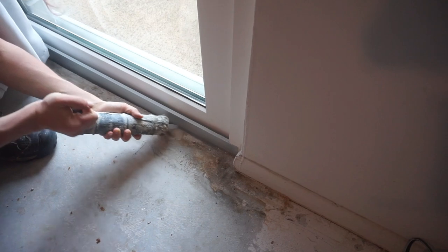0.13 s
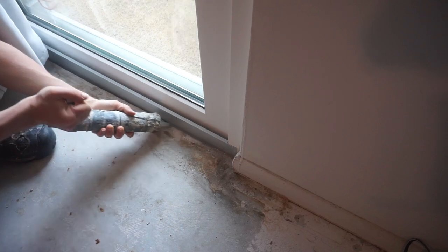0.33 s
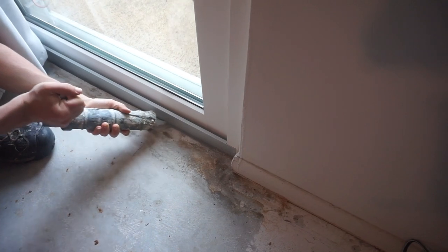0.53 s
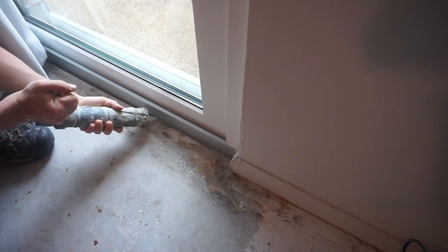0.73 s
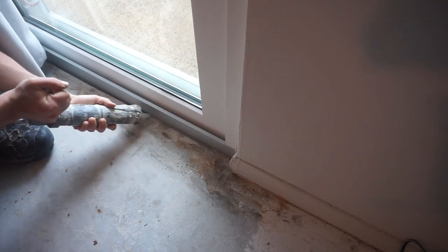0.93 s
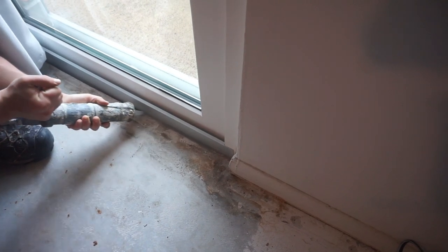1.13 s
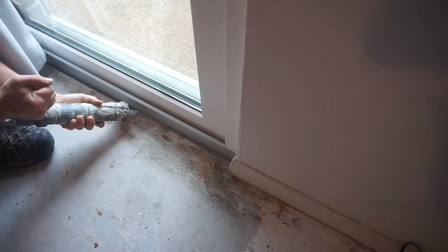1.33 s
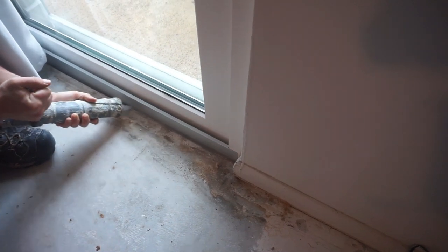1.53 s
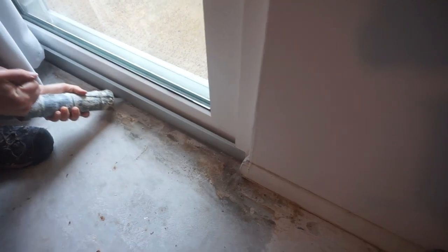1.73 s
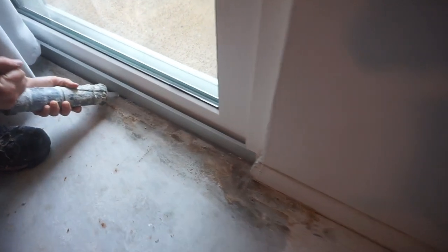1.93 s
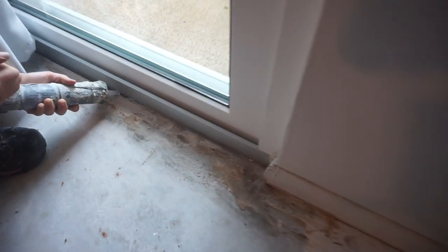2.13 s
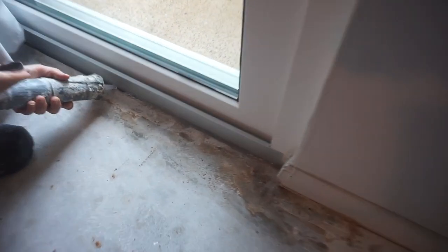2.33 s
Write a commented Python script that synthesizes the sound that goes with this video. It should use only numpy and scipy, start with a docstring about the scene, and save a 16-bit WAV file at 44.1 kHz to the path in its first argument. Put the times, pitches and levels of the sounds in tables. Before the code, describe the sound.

A hand caulking gun is worked close to the microphone in a bare, lightly reverberant room. Dry trigger ticks and low grip tocks start at once; the steel rod pings and squeaks briefly around 0.27-0.55 s. Sparse clicks and hollow cartridge knocks follow, firmer near 1.45 and 1.75-1.9 s, with cloth rustle and a shoe shift. At 2.2 s a loud, rapid steel clatter leaves a spring ringing. Faint air and hum underneath.

```python
"""A bare room, where a hand caulking gun is worked along a concrete edge. Over faint air and hum, noise bands
rustle as hands and clothes, and a shoe shifts once. Noise bursts and decaying modes make the trigger's ticks,
the grip's tocks and the cartridge's knocks. The steel rod pings in decaying modes and squeaks in gliding,
stuttering tones. At the end the mechanism springs back: a loud, short steel clatter of close blows, and tones
that ring on as the room answers."""
import sys
import numpy as np
from scipy import signal
from scipy.fft import rfft, irfft, next_fast_len
from scipy.io import wavfile
from scipy.ndimage import map_coordinates

SR = 44100
rng = np.random.default_rng(int(sys.argv[2]) if len(sys.argv) > 2 else 0)


def int16_out(signal):
    """Quantize to a 16-bit WAV file."""
    q = np.round(np.clip(np.atleast_2d(signal).T, -1, 1) * 32767)
    wavfile.write(sys.argv[1], SR, q.astype(np.int16))


N = 104869  # length in samples
CLOCK = np.arange(N) / SR  # s, the whole scene
T = np.arange(SR // 2) / SR  # s, time since a contact
HEAD = SR // 200  # samples: the first 5 ms, which set a contact's level


def amp(db):
    """Decibels to a linear gain."""
    return 10 ** (np.asarray(db) / 20)


def rms(x):
    """Root mean square level, never quite zero."""
    return np.sqrt(np.mean(x ** 2) + 1e-20)


def along(points, hz):
    """Read a curve of (f/Hz, value) points on a log frequency axis."""
    f, value = np.transpose(points)
    return np.interp(np.log(hz + 1), np.log(f + 1), value)


def filtered(x, response):
    """Shape the spectrum of x by a gain that depends on frequency."""
    n = x.shape[-1]
    padded = next_fast_len(n + 8192)
    spectrum = rfft(x, padded) * response(np.fft.rfftfreq(padded, 1 / SR))
    return irfft(spectrum, padded)[..., :n]


def noise(colour, width, size):
    """Coloured stereo noise, its mid at rms 1; width is side over mid."""
    white = rng.standard_normal((2, size))
    mid, side = filtered(white, lambda hz: amp(along(colour, hz)))
    return np.array([mid + width * side, mid - width * side]) / rms(mid)


def wobble(rate):
    """A smooth random curve with rate knots a second."""
    knots = rng.standard_normal(4096)
    return map_coordinates(knots, [CLOCK * rate], mode="wrap")


def pan(db):
    """Gains that set left over right by db, half on each side."""
    return amp([[db / 2], [-db / 2]])


def add(track, s, sound):
    """Mix a sound into the track at s seconds."""
    part = track[:, max(0, round(s * SR)):][:, :sound.shape[-1]]
    part += sound[:, :part.shape[1]]


def soft_start(attack):
    """Exponential rise of a contact, attack in s."""
    return 1 - np.exp(-T / attack)


def burst(colour, t60, attack, width):
    """Decaying coloured noise, like the densely packed, heavily damped modes of a dull contact."""
    x = noise(colour, width, size=len(T)) * amp(-60 * T / t60) * soft_start(attack)
    return x / rms(x[:, :2 * HEAD]) / np.sqrt(2)


def ring(modes, spread):
    """Sum of decaying sine modes, each reaching left and right in its own phase."""
    x = np.zeros((2, len(T)))
    for hz, db, t60 in modes:
        offset = spread * rng.normal() * np.array([[1], [-1]])
        phase = rng.uniform(0, 2 * np.pi) + offset
        x += amp(db - 60 * T / t60) * np.sin(2 * np.pi * hz * T + phase)
    return x * soft_start(0.0008)


DETUNE = 0.0077  # fraction: the changing grip shifts each mode a little from blow to blow


def struck(modes, spread):
    """A struck part: slightly detuned modes, at rms 1 over the first 5 ms."""
    detuned = [(hz * (1 + DETUNE * rng.normal()), db, t60) for hz, db, t60 in modes]
    x = ring(detuned, spread)
    return x / rms(x[:, :HEAD])


def tilted(modes, tilt_db):
    """The same modes, brighter or duller by dB per octave according to where the blow lands."""
    lowest_hz = modes[0][0]
    return [(hz, db + tilt_db * np.log2(hz / lowest_hz), t60) for hz, db, t60 in modes]


SNAP_T60, SNAP_DB = 0.004, -6  # s; dB relative to the crack's decay


def crack(colour, t60):
    """Steel meets steel: an instant snap over a short bright decay."""
    decay = burst(colour, t60, attack=0.00024, width=0.63)
    snap = burst(colour, SNAP_T60, attack=0.00016, width=0.59)
    return decay + amp(SNAP_DB) * snap


# how long the bare walls hold each frequency (f/Hz, t60/s)
ROOM_DECAY = [(150, 1), (600, 0.42), (2000, 0.55), (5000, 0.63), (11000, 0.39)]
# gain on the side of the reverb (f/Hz, side over mid as a ratio)
ROOM_SPREAD = [(150, 0.2), (500, 0.23), (1200, 0.88), (4000, 0.74)]


def in_room(x, wet_db):
    """Add the answer of bare walls: a noise tail in which each frequency dies at its own speed."""
    hz, t, z = signal.stft(rng.standard_normal((2, SR * 3 // 4)), SR, nperseg=256)
    decay = amp(-60 * t / along(ROOM_DECAY, hz)[:, None])
    mid, side = signal.istft(z * decay, SR, nperseg=256)[1]
    side = filtered(side, lambda f: along(ROOM_SPREAD, f))
    build_up = 1 - np.exp(-np.arange(len(mid)) / SR / 0.0033)
    tail = np.array([mid + side, mid - side]) * build_up
    mono = x.mean(0)[None]
    wet = signal.fftconvolve(mono, tail / np.linalg.norm(mid), axes=1)[:, :x.shape[1]]
    return x + amp(wet_db) * pan(0.31) * wet


# colour of the still air (f/Hz, relative level/dB)
AIR_COLOUR = [(20, -18), (45, -14), (100, 1.5), (300, 15), (800, 12.5), (2000, -14), (10000, -58)]
AIR_DB, HUM_HZ, HUM_DB = -60.5, 59, -82.5


def room_tone():
    """Faint still air as dark noise, with a trace of hum as one steady sine."""
    hum = amp(HUM_DB) * np.sqrt(2) * np.sin(2 * np.pi * HUM_HZ * CLOCK)
    return amp(AIR_DB) * noise(AIR_COLOUR, width=0.42, size=N) + hum


# rustle envelope of hands and clothes (t/s, level of the lows/dB, treble level before its trim/dB)
RUSTLE_MOVES = [(0, -44, -55), (.12, -56, -62.5), (.2, -44, -55.5), (.52, -48, -62), (0.679, -44.5, -58),
                (1.149, -46, -55.5), (1.311, -47.5, -60), (1.42, -64.5, -61), (1.53, -42.5, -48),
                (1.72, -45.5, -50.5), (1.84, -39, -42), (2.05, -47.5, -47.5), (2.19, -46.5, -41),
                (2.36, -72, -48)]
# colour of hands rubbing on the gun (f/Hz, relative level/dB)
RUB_COLOUR = [(60, -42), (150, -19.5), (280, -11), (420, 1), (620, 2.5), (900, 1), (1250, -0.5), (1700, -9),
              (3000, -14.5), (6000, -49)]
# colour of swishing clothes (f/Hz, relative level/dB)
SWISH_COLOUR = [(700, -17), (1600, 9), (2100, 4), (2500, 9), (3300, 3), (4200, 3), (6000, -2), (7600, -1.5),
                (9000, -4), (11000, -7.5)]
# colour of the shoe on the slab (f/Hz, relative level/dB)
SHOE_COLOUR = [(50, -26), (130, -12), (220, 8), (350, 12.5), (550, 3), (1000, -16), (2000, -40)]
SWISH_TRIM_DB = 4.0
SHOE_S, SHOE_DB = 1.908, -36.5


def handling():
    """Friction as noise in two bands: hands rub low, clothes swish high; a shoe shifts once."""
    s, *levels = np.transpose(RUSTLE_MOVES)
    low_db, treble_db = [np.interp(CLOCK, s, level) for level in levels]
    # a slow and a fast wobble, in dB, keep each band restless
    rub_db = low_db + 1.86 * wobble(25.13) + 1.8 * wobble(180)
    swish_db = treble_db + SWISH_TRIM_DB + 1.1 * wobble(20) + 1.36 * wobble(270)
    rub = amp(rub_db) * noise(RUB_COLOUR, width=0.52, size=N)
    swish = amp(swish_db) * noise(SWISH_COLOUR, width=0.73, size=N)
    out = pan(0.24) * (rub + swish)
    add(out, SHOE_S, amp(SHOE_DB) * burst(SHOE_COLOUR, t60=0.28, attack=0.0033, width=0.17))
    return out


# low tocks as the hand works the grip (t/s, level/dB)
GRIP_TOCKS = [(.036, -34.5), (0.155, -35), (0.323, -39.5), (0.367, -35), (0.414, -39), (.772, -39),
              (0.815, -40), (2.264, -41)]
# modes of the grip (f/Hz, relative level/dB, t60/s)
GRIP_MODES = [(397.3, -3.5, 0.07), (442.4, 1.5, 0.035), (538, -11, 0.071)]


def grip():
    """Low tocks of the handle: a few softly started modes."""
    out = np.zeros((2, N))
    for s, db in GRIP_TOCKS:
        add(out, s, amp(db) * struck(GRIP_MODES, spread=0.17) * soft_start(0.0021))
    return in_room(out, wet_db=-4.5)


# trigger ticks (t/s, level/dB, then body, ring and crack relative to it/dB, left over right/dB)
TRIGGER_TICKS = [(0.035, -29.5, -12.5, -11, -20, 5), (0.15, -21, -19.5, -7, -13, 5),
                 (0.231, -32.5, -10, -5, -7.5, 4.5), (0.645, -35, -9, -9, -9, 6.5),
                 (0.817, -22.5, -13.5, -13.5, -11.5, 5.5), (0.869, -19.5, -17.5, -12.5, -10.5, 7),
                 (1.096, -32, -9, -12.5, -13, 6), (1.314, -34.5, -14, -14.5, -14, 7),
                 (1.448, -26.5, -12.5, -9.5, -11.5, 9), (1.4558, -20, -11, -9.5, -16.5, 3),
                 (1.806, -22, -12, -16, -13, -3), (1.892, -23, -12, -18, -15, 4),
                 (2.111, -23.5, -12.5, -12, -25, 1)]
# colour of the tap in the handle (f/Hz, relative level/dB)
TICK_BODY_COLOUR = [(100, -41), (280, -24), (410, -1), (600, -2.5), (850, 2.5), (1080, -4), (1450, -5.5),
                    (2200, -45)]
# colour of the tick's brief ring (f/Hz, relative level/dB)
TICK_RING_COLOUR = [(1100, -29), (1700, -5), (2150, -12), (2420, 3.5), (2650, -0.5), (3000, 2), (3250, -8),
                    (4000, -49)]
# colour of small bright cracks, also in the knocks and pings (f/Hz, relative level/dB)
SMALL_CRACK_COLOUR = [(2400, -38), (3500, 6.5), (4400, 4.5), (5300, -1), (5900, 2.5), (7400, 2.5),
                      (9000, -6), (11000, -9.5)]


def trigger():
    """Small dry ticks, layered from damped noise: a tap in the handle, a brief ring and a crack."""
    out = np.zeros((2, N))
    for s, db, body_db, ring_db, crack_db, pan_db in TRIGGER_TICKS:
        tick = amp(body_db) * burst(TICK_BODY_COLOUR, t60=0.04, attack=0.00091, width=0.4)
        tick += amp(ring_db) * burst(TICK_RING_COLOUR, t60=0.049, attack=0.0011, width=0.59)
        tick += amp(crack_db) * crack(SMALL_CRACK_COLOUR, t60=0.032)
        add(out, s, in_room(amp(db) * pan(pan_db) * tick, wet_db=-7.0))
    return out


# cartridge knocks (t/s, level/dB, then body, ring and crack relative to it/dB, left over right/dB)
CARTRIDGE_KNOCKS = [(0.324, -27, -12.5, -13, -18, 1), (0.372, -20.5, -11, -13, -15, 3),
                    (0.575, -29.5, -6, -12.5, -22.5, 5.5), (0.856, -19.5, -15.5, -20, -19, 0),
                    (1.024, -28.5, -14, -13.5, -21, 6), (1.131, -29, -4, -16, -16, 1.5),
                    (1.245, -25.5, -4.5, -20.5, -26, 2), (1.295, -30.5, -5.5, -25, -27, 5),
                    (1.476, -19.5, -7.5, -14, -24, 3.5), (1.753, -14.5, -10.5, -14.5, -17, 2),
                    (1.791, -20, -8.5, -10, -20, 3), (1.874, -14.5, -8, -14, -24, 0.5),
                    (1.907, -20.5, -11, -12.5, -22, 3)]
# colour of the knock's body (f/Hz, relative level/dB)
KNOCK_BODY_COLOUR = [(100, -54), (300, -9), (560, -11.5), (800, 3.5), (950, 0.5), (1100, 1), (1300, -3.5),
                     (1600, -17), (2400, -55)]
# hollow modes of the cartridge (f/Hz, relative level/dB, t60/s)
TUBE_MODES = [(791, 0.5, 0.037), (995, 1, 0.024), (1115, -1, 0.037), (1280, -9, 0.034)]
# colour of the knock's ring, also of the scrape (f/Hz, relative level/dB)
KNOCK_RING_COLOUR = [(1200, -21), (1830, 2.5), (2100, -4), (2380, 4), (2800, -4), (3300, -2), (4500, -21)]
KNOCK_SOFTENING = 0.48  # dB less of the hollow modes per dB under the hardest knock


def cartridge():
    """Hollow knocks of the plastic cartridge in its cradle: tube modes inside damped noise."""
    out = np.zeros((2, N))
    hardest_db = max(row[1] for row in CARTRIDGE_KNOCKS)
    for s, db, body_db, ring_db, crack_db, pan_db in CARTRIDGE_KNOCKS:
        tube_db = body_db + KNOCK_SOFTENING * (db - hardest_db)
        knock = amp(body_db) * burst(KNOCK_BODY_COLOUR, t60=0.047, attack=0.0012, width=0.27)
        knock += amp(tube_db) * struck(TUBE_MODES, spread=0.64)
        knock += amp(ring_db) * burst(KNOCK_RING_COLOUR, t60=0.052, attack=0.00062, width=0.61)
        knock += amp(crack_db) * burst(SMALL_CRACK_COLOUR, t60=0.017, attack=0.00044, width=1.0)
        add(out, s, in_room(amp(db) * pan(pan_db) * knock, wet_db=-3.5))
    return out


# the rod slips in its catch (t/s, ring level/dB, crack level/dB, tilt/dB per octave, left over right/dB)
ROD_PINGS = [(0.2665, -19, -30.5, 0, 6), (0.4371, -23.5, -50, -10, 8)]
# modes of the steel rod (f/Hz, relative level/dB, t60/s)
ROD_MODES = [(1745, 2.5, 0.019), (1940, -3.5, 0.032), (2050, -11, 0.029), (2540, -1.5, 0.024),
             (3067, -7, 0.034), (4250, -8, 0.013), (5120, -8, 0.012)]
# squeaks (t/s, length/s, start f/Hz, end f/Hz, starting level/dB, upper partial/dB, roughness/dB)
ROD_SQUEAKS = [(.298, 0.024, 1852, 1805, -33.5, -12.5, 4.5), (.3705, 0.032, 1791, 1739, -27.5, -10, 1.4),
               (.402, 0.028, 1727, 1810, -40.5, -11, 3.5), (.404, 0.0263, 2386, 2060, -40, -30, 2.5),
               (0.443, 0.049, 1930, 1894, -41.5, -22, 4.5), (.53, 0.023, 1765, 1810, -46, -25, 0.5)]
SQUEAK_UPPER = 1.48  # frequency ratio of the upper partial
SQUEAK_THIRD_DB = -15  # third harmonic, relative to the upper partial
SQUEAK_JITTER = 17.7  # Hz of pitch jitter per dB of roughness
SQUEAK_EDGE_S, SQUEAK_SAG, SQUEAK_PAN_DB = 0.0046, 90, 12  # fade in s, sag in dB/s, left over right


def squeak(length, start_hz, end_hz, db, upper_db, rough_db):
    """Stick and slip in the catch: a gliding tone whose pitch and level stutter with roughness."""
    t = T[T < length]
    glide_hz = start_hz + (end_hz - start_hz) * t / length
    hz = glide_hz + SQUEAK_JITTER * rough_db * wobble(372)[:len(t)]
    phase = 2 * np.pi * np.cumsum(hz) / SR
    upper = np.sin(SQUEAK_UPPER * phase) + amp(SQUEAK_THIRD_DB) * np.sin(3 * phase)
    tone = np.sqrt(2) * (np.sin(phase) + amp(upper_db) * upper)
    stutter = amp(rough_db * wobble(413)[:len(t)])
    edges = np.clip(np.minimum(t, length - t) / SQUEAK_EDGE_S, 0, 1)
    level = amp(db - SQUEAK_SAG * t) * stutter / rms(stutter) * edges
    return pan(SQUEAK_PAN_DB) * level * tone


def rod():
    """The rod pings in steel modes as it slips, and squeaks as it slides through the catch."""
    out = np.zeros((2, N))
    for s, ring_db, crack_db, tilt_db, pan_db in ROD_PINGS:
        ping = amp(ring_db) * struck(tilted(ROD_MODES, tilt_db), spread=0.57)
        ping += amp(crack_db) * burst(SMALL_CRACK_COLOUR, t60=0.024, attack=0.0013, width=0.59)
        add(out, s, pan(pan_db) * ping)
    for s, *shape in ROD_SQUEAKS:
        add(out, s, squeak(*shape))
    return in_room(out, wet_db=-8.0)


# blows of the closing clatter (t/s, body level/dB, ring level/dB, crack level/dB, ring tilt/dB per octave)
CLATTER_BLOWS = [(2.2082, -21.5, -12, -24, 1), (2.2119, -26, -22, -21.5, 8), (2.216, -28.5, -9, -22, -3),
                 (2.2207, -48, -14, -12, 16), (2.2253, -44, -20.5, -13, 7), (2.232, -59, -18.5, -22, 9),
                 (2.238, -50, -23, -12, 10), (2.2444, -57, -21.5, -17.5, 0), (2.2478, -66, -17.5, -18.5, 7),
                 (2.2638, -43, -21, -26, -4)]
# low modes of the gun's body (f/Hz, relative level/dB, t60/s)
BODY_MODES = [(498, -1, 0.032), (706, 1.5, 0.017), (847, 0, 0.039), (1075, -2, 0.035)]
# steel frame, damped by the hand (f/Hz, relative level/dB, t60/s)
FRAME_MODES = [(1472, -9, 0.027), (1760, -2.5, 0.031), (1887, 0, 0.031), (2060, -8, 0.036),
               (2225, -2.5, 0.04), (2415, -3, 0.029), (2656, -7.5, 0.026), (3060, -14.5, 0.027)]
# colour of the steel crack (f/Hz, relative level/dB)
FRAME_CRACK_COLOUR = [(2200, -33), (3200, -3.5), (4300, 0), (4750, -5), (5350, 2), (6100, -7.5), (6800, 0),
                      (7250, -8), (7600, 1.5), (8200, -6.5), (9500, -8.5), (11000, -8)]
# tones that ring on after the clatter as the room answers (f/Hz, peak level before pan/dB, t60/s)
AFTER_TONES = [(1668, -14, 0.13), (1675, -31.5, 0.97), (1960, -36, 0.42), (2330, -32, 0.53),
               (7750, -44, 0.3)]
SCRAPE_S, SCRAPE_DB, AFTER_S = 2.2025, -21, 2.2475


def clatter():
    """The mechanism scrapes, strikes the frame in quick separate blows, and tones ring on after them."""
    out = np.zeros((2, N))
    scrape = burst(KNOCK_RING_COLOUR, t60=0.085, attack=0.0043, width=0.6)
    add(out, SCRAPE_S, amp(SCRAPE_DB) * scrape)
    for s, body_db, ring_db, crack_db, tilt_db in CLATTER_BLOWS:
        blow = amp(body_db) * struck(BODY_MODES, spread=0.36)
        blow += amp(ring_db) * struck(tilted(FRAME_MODES, tilt_db), spread=0.44)
        blow += amp(crack_db) * crack(FRAME_CRACK_COLOUR, t60=0.021)
        add(out, s, blow)
    out = in_room(out, wet_db=-13)
    add(out, AFTER_S, ring(AFTER_TONES, spread=0.67))  # the lingering tones are added without further reverb
    return pan(2.6) * out


def small(x):
    """A small object radiates little bass: a high-pass at 202 Hz."""
    return signal.sosfilt(signal.butter(3, 202, "highpass", fs=SR, output="sos"), x)


def scene():
    """Room and handling under everything the gun does."""
    gun = grip() + trigger() + cartridge() + rod() + clatter()
    return room_tone() + handling() + small(gun)


# the microphone's fall in the top treble (f/Hz, gain/dB)
MIC_TREBLE = [(11050, -2.5), (11500, -39), (12300, -36), (15000, -36)]
CEILING, TOP_HZ = 0.95, 15725  # full scale 1; nothing passes from TOP_HZ up


def record(dry):
    """The loudest peaks are rounded off; the microphone falls away steeply in the top treble."""
    rounded = dry / (1 + np.abs(dry / CEILING) ** 6) ** (1 / 6)
    return filtered(rounded, lambda hz: amp(along(MIC_TREBLE, hz)) * (hz < TOP_HZ))


dry = scene()
out = record(dry)
int16_out(out)
```